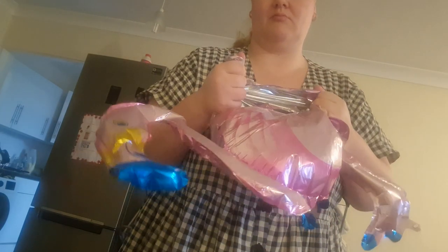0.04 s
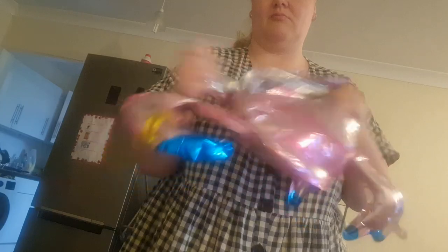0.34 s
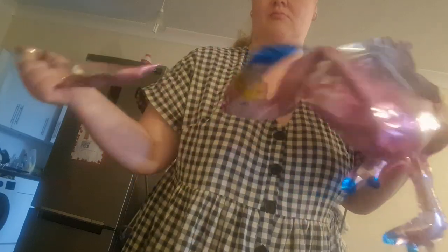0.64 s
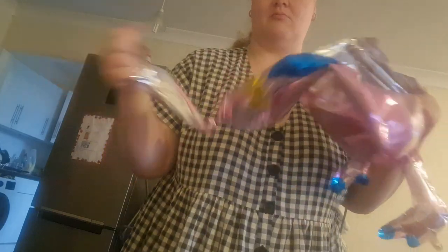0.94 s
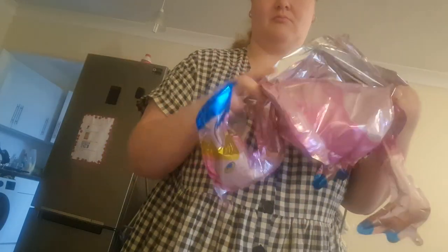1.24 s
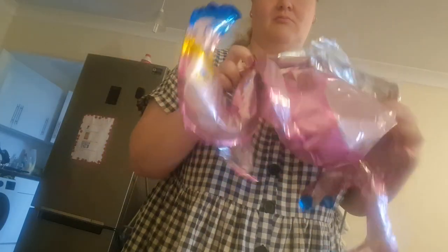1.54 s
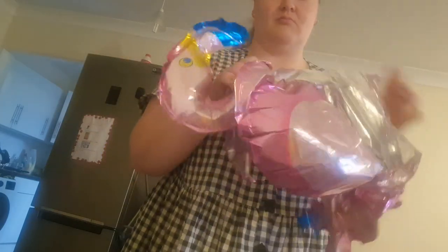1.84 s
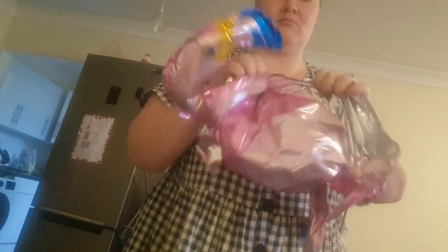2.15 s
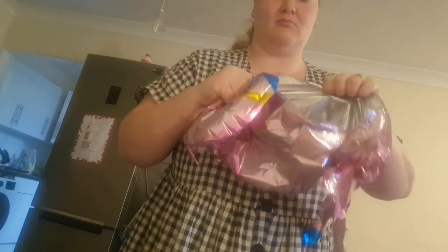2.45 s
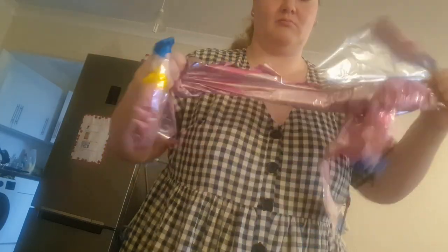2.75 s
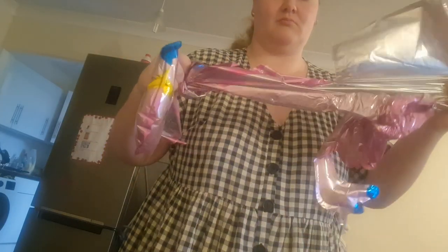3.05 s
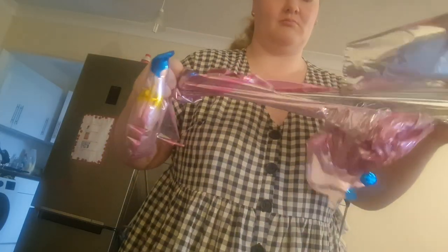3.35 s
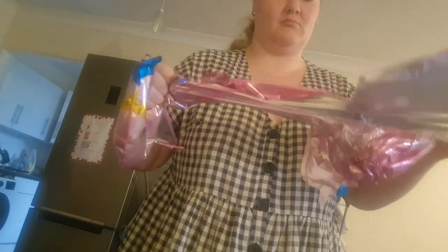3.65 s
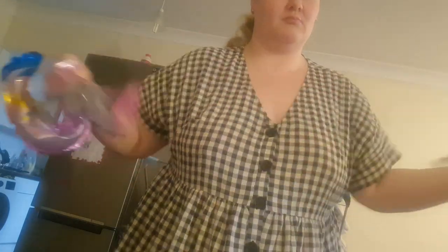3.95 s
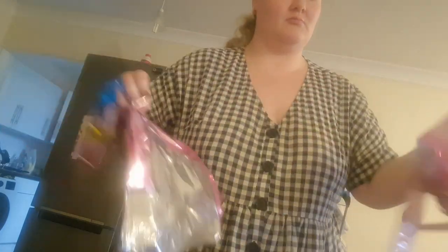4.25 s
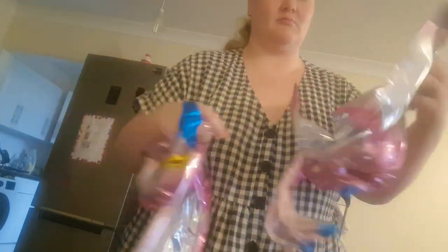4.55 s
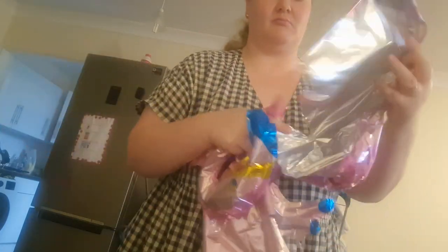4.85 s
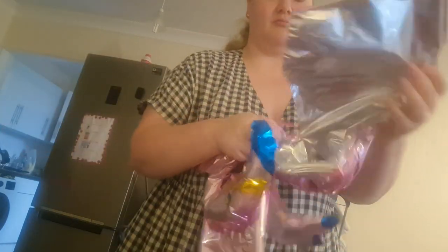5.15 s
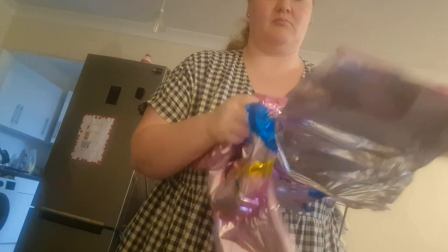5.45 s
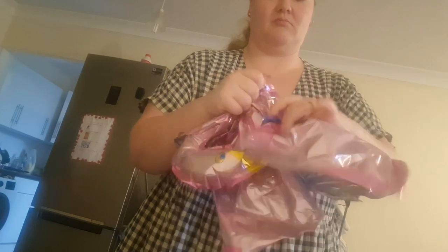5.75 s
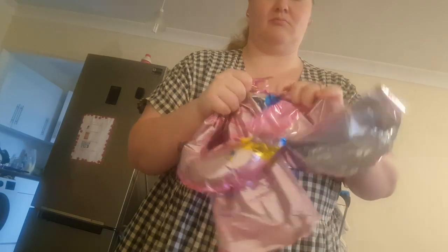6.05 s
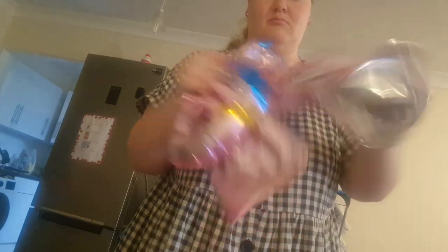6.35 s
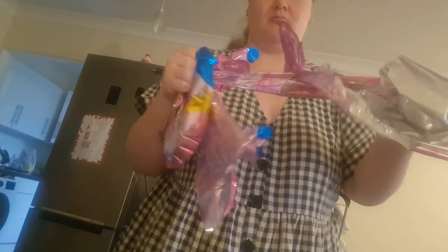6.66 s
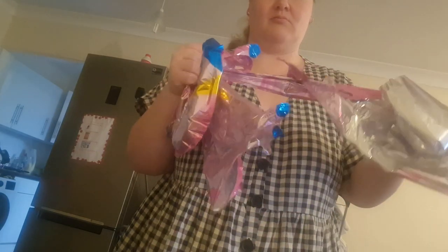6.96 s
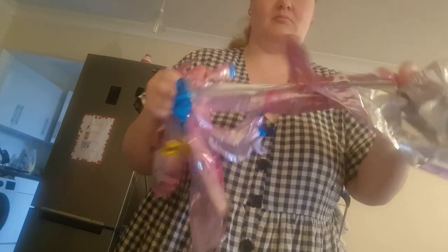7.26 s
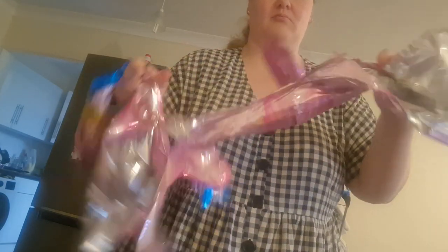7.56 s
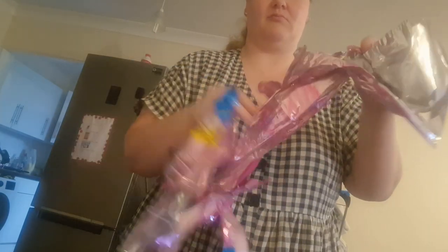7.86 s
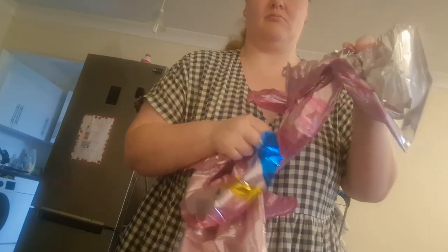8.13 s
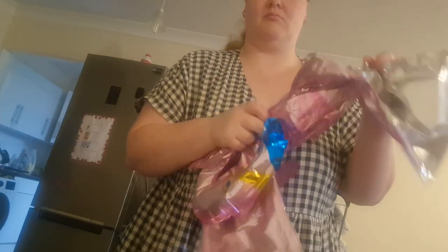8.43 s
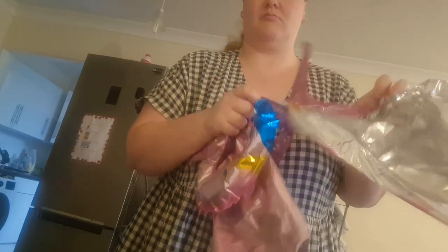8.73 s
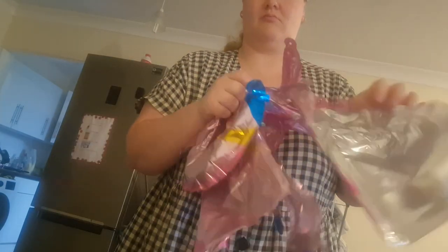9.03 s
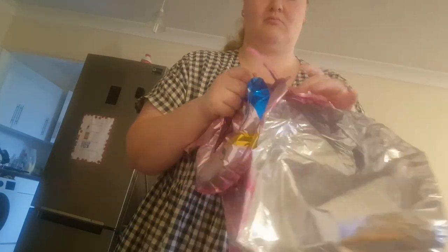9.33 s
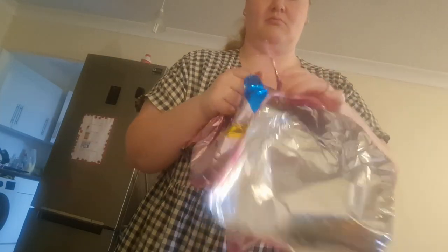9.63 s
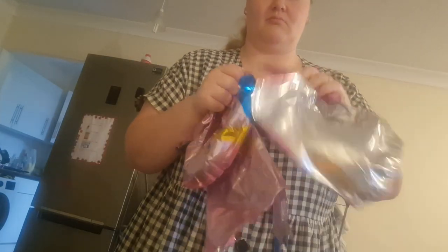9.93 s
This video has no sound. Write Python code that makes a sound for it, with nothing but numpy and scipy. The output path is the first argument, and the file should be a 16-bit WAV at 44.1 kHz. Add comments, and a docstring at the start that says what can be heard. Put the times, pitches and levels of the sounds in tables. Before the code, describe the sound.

A deflated foil balloon is crumpled and pulled by hand, giving a dense, uneven crackle with small pops. About three seconds in, the taut film snaps loudly and rips, then tears again a second later with a brief flap. Quieter crinkling follows, then one more loud rip and further rustling. It is heard from about a metre away in a small kitchen with a faint appliance hum.

```python
"""Tearing a foil balloon

A limp foil balloon is crumpled, stretched and torn by hand in a kitchen, about a metre from a phone.
Creases buckle in a dense crackle; taut film snaps, rips in fast runs and flaps the air as it slackens.
Near surfaces and the small room answer each crack, over a faint appliance hum."""
import sys
import numpy as np
from scipy import signal
from scipy.fft import rfft, irfft, next_fast_len
from scipy.io import wavfile
from scipy.ndimage import uniform_filter1d

SR = 44100
rng = np.random.default_rng(int(sys.argv[2]) if len(sys.argv) > 2 else 0)


def output_pcm(signal):
    """Save a mono or channel-first signal as 16-bit PCM at the path in sys.argv[1].

    Samples are clipped to [-1, 1] before scaling.
    """
    pcm = np.clip(np.atleast_2d(signal).T, -1, 1) * 32767
    wavfile.write(sys.argv[1], SR, np.round(pcm).astype(np.int16))


N = 440559
TIME_S = np.arange(N) / SR

# House rumble and hiss. Each row: frequency in Hz, relative density in dB.
RUMBLE_SPECTRUM = [(20, -15), (36, 10), (50, -2.5), (72, 6), (110, 0), (150, -2), (200, -10.5), (300, -14),
                   (550, -40.5), (2000, -51), (16000, -57)]
# Appliance hum. Each row: frequency in Hz, rms level before drift and swell in dB.
HUM_TONES = [(37, -68.5), (73, -73), (98, -66), (122.5, -67)]
# Swell of the deepest hum tone. Each row: time in seconds, gain in dB.
HUM_SWELL = [(0, 6), (.8, -3), (1.4, 11.5), (3.4, 12.5), (4.0, -4), (6.5, -5.5), (8.6, 2.5), (9.99, -11.5)]
# Squeezes and pulls. Each row: start and end of the hold in seconds, build-up in seconds,
# relative crackle level in dB, brightness in dB.
GRIPS = [(0, 0.323, .02, -51.5, -1), (0.457, 0.481, 0.057, -28.5, -2), (0.532, .55, .015, -29, 1),
         (0.634, 0.674, 0.043, -36.5, -2.5), (0.805, 1.11, 0.055, -51.5, 1.5),
         (1.145, 1.154, 0.015, -42, 2.5), (1.363, 1.466, 0.036, -44, -0.5), (1.516, 1.897, 0.04, -43, -1),
         (2.275, 2.434, 0.2, -37.5, -1), (2.552, 2.662, 0.11, -41, -3), (2.89, 3.07, 0.029, -45, 1),
         (3.176, 3.333, 0.06, -48.5, 5.5), (3.45, 3.526, 0.016, -46.5, 7), (3.65, 3.82, 0.033, -53.5, 6),
         (4.208, 4.47, 0.07, -49, 3), (4.559, 5.062, 0.18, -46.5, 0.5), (5.196, 5.247, 0.08, -44.5, 0.5),
         (5.364, 5.597, 0.15, -45, -1.5), (5.683, 5.71, 0.059, -49, -3), (5.831, 5.9, 0.053, -41.5, -1),
         (6.01, 6.413, 0.12, -44.5, 1), (6.453, 6.531, 0.011, -34.5, 6), (6.804, 6.97, 0.082, -51.5, 3),
         (7.065, 7.08, 0.022, -54, -0.5), (7.276, 7.421, 0.045, -44, 0.5), (7.55, 7.724, .12, -49, 2),
         (7.864, 8.227, 0.13, -47.5, 0.5), (8.306, 8.533, 0.025, -48, 1), (8.583, 8.64, .03, -45, -1.5),
         (8.794, 9.072, 0.26, -48, 0.5), (9.122, 9.27, 0.15, -54.5, -2), (9.401, 9.46, 0.011, -62, 1),
         (9.595, 9.665, 0.03, -51.5, -1.5), (9.826, 9.952, 0.054, -42.5, 1.5)]
# Buckling panels. Each row: time in seconds, typical pitch in Hz, offset from the grip level in dB.
PANELS = [(0, 1190, -2), (.6, 1200, -7.5), (1.2, 1300, -8.5), (2.3, 1400, -5.5), (3.6, 1400, -14),
          (4.7, 1700, -5), (5.5, 1420, -10), (6.2, 1420, -4.5), (7.0, 1114, -9.5), (7.7, 1260, -13.5),
          (8.3, 1565, -3.5), (9.1, 1400, -5), (9.7, 1200, -14), (9.99, 1330, 1)]
# Folds snapping through. Each row: time in seconds, relative level in dB, panel pitch in Hz,
# brightness in dB.
SNAPS = [(0.0253, -36.5, 1170, -24), (0.096, -42.5, 990, 14), (0.1738, -21.5, 1370, 6),
         (0.2617, -21.5, 1285, 8.5), (0.3373, -21.5, 1360, -2), (0.3553, -28.5, 1380, 1),
         (0.3813, -22.5, 2080, -4), (0.4044, -27, 1400, 1), (0.4213, -26, 1380, -25),
         (0.4414, -21.5, 1410, -21), (0.821, -33.5, 1350, -1), (1.128, -34, 2400, 14),
         (1.1524, -33.5, 1370, 5), (1.3514, -35, 1340, 6), (1.5089, -35.5, 1530, 3),
         (2.6453, -21.5, 1460, -9), (2.76, -12, 1560, 5), (2.7801, -11.5, 1530, 3), (2.913, -22, 2440, -2),
         (3.1876, -16, 1990, 1.5), (3.2395, -21.5, 1200, 4), (3.2916, -15.5, 1250, 7.5),
         (3.4665, -15.5, 2040, 5), (3.4866, -25.5, 2090, 12), (3.5115, -30, 1070, -4),
         (3.589, -26, 1500, 4), (3.669, -13, 1380, 21), (3.8156, -25, 1400, 7), (3.843, -5.5, 1244, 7),
         (3.864, -7, 1620, 7.5), (3.8697, -6, 1590, 19), (4.2003, -41.5, 1450, -14), (4.767, -43, 960, 10),
         (4.8267, -40, 1740, -11), (4.8631, -37, 1860, -5), (4.9376, -39.5, 1420, 2),
         (5.1043, -40, 1700, -29), (5.1446, -35.5, 1880, 8), (5.2154, -34, 960, 4), (5.392, -32, 2440, 17),
         (5.817, -36, 1500, 3), (6.0335, -35.5, 1410, -10), (6.4677, -7.5, 1080, 9.5),
         (6.5307, -9.5, 1100, -5), (6.5394, -11.5, 1900, -2.5), (6.7525, -42.5, 1010, -19),
         (6.7995, -40, 1253, 0), (7.2175, -33, 2350, 9), (7.245, -36, 1040, -8), (7.3817, -34.5, 1300, 10),
         (7.278, -29, 2260, 18), (7.4347, -34, 1570, -8), (7.7155, -36.5, 1460, 20),
         (7.871, -35.5, 2600, 7), (7.946, -40, 1250, 5), (8.1447, -36, 2240, 2), (8.177, -34, 1350, 11),
         (8.3628, -39, 1970, 10), (8.5044, -34, 2040, 3), (8.8972, -34, 1310, 18), (9.0286, -35, 1460, -9),
         (9.5476, -47.5, 2480, 3), (9.591, -46, 1420, -13), (9.6916, -45.5, 1010, -15),
         (9.7818, -40.5, 1640, -15)]
# Slack film swinging. Each row: centre in seconds, pitch in Hz, envelope peak in dB,
# half length in seconds.
FLAPS = [(0.543, 94, -39, .012), (2.646, 130, -33.5, 0.0035), (2.647, 297, -36, 0.0035),
         (2.773, 118, -29.5, 0.008), (3.669, 100, -31, 0.0038), (3.846, 108, -33, 0.0074),
         (3.864, 240, -32, .004), (6.538, 326, -25, 0.0023), (6.539, 65, -28, 0.008),
         (6.550, 316, -24.5, 0.0064), (6.552, 129, -21, 0.0075), (6.590, 141, -49, 0.0066),
         (6.637, 126.6, -43, 0.019)]
# Runs of a tear. Each row: start and end in seconds, relative level at start and end in dB,
# brightness in dB, bass gain in dB.
RIPS = [(2.643, 2.756, -27, -37.5, -3, -6.5), (2.725, 2.756, -30, -17.5, -4, -12),
        (2.761, 2.772, -5, -22, -0.5, -10.5), (2.775, 2.831, -16.5, -37.5, 3, -10),
        (3.282, 3.33, -37, -47, 4, 0), (3.471, 3.505, -39, -41.5, -9, -3),
        (3.669, 3.681, -18, -38.5, -9.5, -2.5), (3.825, 3.855, -31.5, -25.5, 1, -3),
        (3.873, 3.925, -30, -32, -2.5, -1.5), (6.473, 6.52, -29, -27, -1.5, -11),
        (6.521, 6.555, -25, -22.5, -1.5, 0.5)]
# What every crack sounds like: the film's radiation together with the low resonances of the room # between 200
# and 400 Hz. Each row: frequency in Hz, relative density in dB.
CRACK_SPECTRUM = [(20, -21), (50, -4.5), (150, -0.5), (215, 1.5), (300, -0.5), (400, 0.5), (580, -6),
                  (800, -6), (1100, -1.5), (1500, 0), (1800, -5), (2150, 1), (2800, -3.5), (4000, 1.5),
                  (5600, 0), (7700, -3.5), (10000, -10), (13500, -11), (16000, -15)]
# Spots on the balloon. Each row: lead of the left microphone in seconds, left minus right in dB.
SPOTS = [(0.000098, 3.5), (0.00015, 7.5), (0.000024, 1)]

OCTAVES_HZ = 110 * 2. ** np.arange(8)
EASE_DB_PER_S, RELEASE_S, REST_DB = 14, 0.029, -67
SETTLE_DB, SETTLE_S, SETTLE_BRIGHT_DB = -30.5, 0.068, 9
LEAD_IN_SAMPLES = 256
LEFT_RIGHT = np.array([[1], [-1]])


def undb(db):
    """Decibels to gain."""
    return 10 ** (np.asarray(db) / 20)


def unit(x):
    """Scale to rms 1."""
    return x / np.sqrt(np.mean(x ** 2))


def bin_gains(points, size):
    """Gain of a (Hz, dB) spectrum on FFT bins."""
    hz, db = np.transpose(points)
    return undb(np.interp(np.log(np.fft.rfftfreq(size, 1 / SR) + 1), np.log(hz), db))


def response(points, size=1024):
    """Minimum-phase impulse response of a (Hz, dB) spectrum; energy 1."""
    cepstrum = irfft(np.log(bin_gains(points, size)))
    cepstrum[1:size // 2] *= 2
    cepstrum[size // 2 + 1:] = 0
    return unit(irfft(np.exp(rfft(cepstrum)))) / np.sqrt(size)


def add(track, at_s, sound):
    """Mix a sound into a track."""
    start = max(int(at_s * SR), 0)
    part = sound[:max(N - start, 0)]
    track[start:start + len(part)] += part


def drift(rate_hz):
    """Smooth random drift, spread near 1."""
    hold = int(SR / rate_hz)
    steps = np.repeat(rng.standard_normal(N // hold + 1), hold)
    return 1.275 * uniform_filter1d(uniform_filter1d(steps, hold), hold)[:N]


def tilt(hz):
    """Gain in dB per dB of brightness: lows and mids down, treble up."""
    return np.interp(np.log(hz), np.log([1800, 6000, 13000]), [-.5, .45, .7])


def hum_and_rumble():
    """An appliance hums unsteadily over the low rumble of the house."""
    colour = bin_gains(RUMBLE_SPECTRUM, N)
    mid, side = (unit(irfft(rfft(rng.standard_normal(N)) * colour, N)) for _ in range(2))
    out = undb(-59 + drift(2.6)) * (mid + undb(-16.5) * side * LEFT_RIGHT)
    swell_db = np.interp(TIME_S, *np.transpose(HUM_SWELL))
    for k, (hz, db) in enumerate(HUM_TONES):
        phase = 2 * np.pi * np.cumsum(hz + 1.42 * drift(4)) / SR
        out += np.sqrt(2) * undb(db + 1.6 * drift(3.9) + swell_db * (k == 0)) * np.sin(phase)
    return out


def handling():
    """Crackle level and brightness in dB: grips build, ease and let go; film settles after snaps."""
    power, weighted_bright = np.full(N, undb(REST_DB) ** 2), np.zeros(N)
    for start_s, end_s, build_s, db, bright_db in GRIPS:
        t = np.arange(max(start_s - 1, 0), end_s + .5, 1 / SR)
        force = np.exp(np.minimum(t - start_s, 0) / build_s - np.maximum(t - end_s, 0) / RELEASE_S)
        grip = (force * undb(db - EASE_DB_PER_S * np.maximum(t - start_s, 0))) ** 2
        add(power, t[0], grip)
        add(weighted_bright, t[0], grip * bright_db)
    fade = np.exp(-np.arange(SR // 2) / SR / SETTLE_S)
    for at_s, db, _, _ in SNAPS:
        settle = (undb(db + SETTLE_DB) * fade) ** 2
        add(power, at_s, settle)
        add(weighted_bright, at_s, settle * SETTLE_BRIGHT_DB)
    return 10 * np.log10(power), weighted_bright / power


def crackle(level, bright_db, low_db, top_db, rate_hz, spread_db, colour_db, ring_s, even_s):
    """Creases pop at random and shiver, each with its own size and colour; one track a spot."""
    count = int(rate_hz * N / SR)
    onset, spot = rng.integers(0, N, count), rng.integers(0, len(SPOTS), count)
    strength = undb(spread_db * rng.standard_normal(count))
    # The hands feed energy steadily: a big pop leaves less for its neighbours.
    local_power = uniform_filter1d(np.bincount(onset, strength ** 2, N), int(even_s * SR))
    strength *= level[onset] / np.sqrt(local_power[onset] + 1e-9)
    pole = np.exp(-2 / (ring_s * SR))
    size = next_fast_len(N)
    octave = np.log2(np.clip(np.fft.rfftfreq(size, 1 / SR), OCTAVES_HZ[0], OCTAVES_HZ[-1]))
    spectra = np.zeros((len(SPOTS), len(octave)), complex)
    for hz in OCTAVES_HZ:
        edge_db = low_db[onset] * (hz < OCTAVES_HZ[3]) + top_db[onset] * (hz == OCTAVES_HZ[-1])
        colour = unit(undb(colour_db * rng.standard_normal(count)))
        colour *= undb(bright_db[onset] * tilt(hz) + edge_db)
        band = np.sqrt(np.clip(1 - abs(octave - np.log2(hz)), 0, 1))
        for k in range(len(SPOTS)):
            energy = np.bincount(onset, (strength * colour) ** 2 * (spot == k), N)
            envelope = np.sqrt(signal.lfilter([1 - pole], [1, -pole], energy + 1e-18))
            spectra[k] += band * rfft(envelope * rng.standard_normal(N), size)
    return irfft(spectra, size)[:, :N]


def panel_pop(hz, ring_s, size=1024):
    """A panel flips and rings for a few cycles; energy 1."""
    t = np.arange(size) / SR
    return unit(np.sin(2 * np.pi * hz * t) * t * np.exp(-t / ring_s)) / np.sqrt(size)


def buckling(work_db, rate_hz, gain_db, spread_db, pitch_scatter, ring_s):
    """Wider panels between the creases flip with hollow pops, each at its own pitch."""
    tracks = np.zeros((len(SPOTS), N))
    panel_s, panel_hz, panel_db = np.transpose(PANELS)
    count = int(rate_hz * N / SR)
    times_s = rng.uniform(0, TIME_S[-1], count)
    for k, at_s in enumerate(times_s):
        force, detune = rng.standard_normal(2)
        typical_db = work_db[int(at_s * SR)] + np.interp(at_s, panel_s, panel_db) + gain_db
        gain = undb(typical_db + spread_db * np.tanh(force)) * np.sqrt(SR / 1000)
        hz = np.interp(at_s, panel_s, panel_hz) * np.exp(pitch_scatter * detune)
        add(tracks[k % len(SPOTS)], at_s, gain * panel_pop(hz, ring_s))
    return tracks


def crumpling():
    """Squeezing buckles many small creases; harder work moves larger panels, which add body."""
    work_db, bright_db = handling()
    work_db += 0.61 * drift(16)  # the film gives way unevenly
    low_db = np.minimum(-5.0 + 0.092 * (work_db + 45.5), -1.2) - 0.38 * bright_db
    top_db = 0.16 * np.maximum(work_db + 49.5, 0)  # hard creases are sharper
    creases = crackle(undb(work_db + 1.0), bright_db, low_db, top_db,
                      rate_hz=480, spread_db=3.0, colour_db=5.0, ring_s=0.0018, even_s=0.05)
    panels = buckling(work_db - .5 * bright_db,
                      rate_hz=130, gain_db=2, spread_db=6.5, pitch_scatter=0.17, ring_s=0.00089)
    return creases + panels


def snapping(length_s, rise_s, gain_db, low_db, sparkle_db, panel_db, panel_ring_s, size=1024):
    """A taut fold cracks and its panel pops; in dull snaps the pop leads."""
    tracks, t = np.zeros((len(SPOTS), N)), np.arange(size) / SR
    hz = np.fft.rfftfreq(size, 1 / SR) + 1
    film = response(CRACK_SPECTRUM)
    envelope = np.exp(-(t / length_s) ** 4) * (1 - np.exp(-t / rise_s)) ** 2
    for k, (at_s, db, pitch_hz, bright_db) in enumerate(SNAPS):
        burst = rng.standard_normal(size) * envelope
        bass_db = (low_db + 0.13 * bright_db) / (1 + (hz / 700) ** 4)
        loss_db = 0.24 * max(db + 13.5, 0)  # big folds are duller
        top_db = (sparkle_db - loss_db) / (1 + (9000 / hz) ** 8)
        colour = response(np.c_[hz, 0.97 * bright_db * tilt(hz) + bass_db + top_db])
        crack = unit(np.convolve(burst, colour)[:size]) / np.sqrt(size)
        snap = crack + undb(panel_db - bright_db) * panel_pop(pitch_hz, panel_ring_s)
        rms_3ms = np.sqrt(np.sum(np.convolve(snap, film) ** 2) / (.003 * SR))
        add(tracks[k % len(SPOTS)], at_s - rise_s, snap * undb(db + gain_db) / rms_3ms)
    return tracks


def flapping():
    """The freed sheet swings briefly, slowing as it slackens."""
    track = np.zeros(N)
    for centre_s, hz, db, half_s in FLAPS:
        t = np.arange(-3 * half_s, 3 * half_s, 1 / SR)
        swing = np.sin(2 * np.pi * hz * t * np.exp(-.06 * t / half_s))
        add(track, centre_s + t[0], undb(db) * swing * np.exp(-(t / half_s) ** 2))
    return track


def tearing():
    """A running tear breaks the film in tiny steps, too fast to hear apart."""
    level, bright_db, low_db = np.zeros((3, N))
    for start_s, end_s, first_db, last_db, run_bright_db, run_low_db in RIPS:
        run = (TIME_S >= start_s) & (TIME_S < end_s)
        level[run] = undb(np.linspace(first_db, last_db, run.sum()))
        bright_db[run], low_db[run] = run_bright_db, run_low_db
    return crackle(level, bright_db, low_db, top_db=np.full(N, -1.5),
                   rate_hz=4000, spread_db=5, colour_db=2.0, ring_s=0.00092, even_s=0.01)


def kitchen(lead_s, pan_db, sheet_db, sheet_s, near_db, near_s, tail_db, t60_s, treble_t60_s):
    """Stereo direct and echo responses: the foil shivers, body and cupboards reflect, the room rings."""
    size = SR // 2
    t, hz = np.arange(size) / SR, np.fft.rfftfreq(size, 1 / SR)
    noise = rng.standard_normal((2, size))
    dull = signal.sosfilt(signal.butter(2, 6000, fs=SR, output="sos"), noise)
    bright = signal.sosfilt(signal.butter(2, 6000, "high", fs=SR, output="sos"), noise)
    tail = (dull * 1000 ** (-t / t60_s) + bright * 1000 ** (-t / treble_t60_s)) * (t > .01)
    near = rng.standard_normal((2, size)) * np.exp(-t / near_s) * (t > .0025)
    sheet = rng.standard_normal((2, size)) * np.exp(-t / sheet_s)
    decay = undb(sheet_db) * unit(sheet) + undb(near_db) * unit(near) + undb(tail_db) * unit(tail)
    mid, side = rfft(decay) / np.sqrt(2 * size)
    coherence = np.sinc(hz / 1300)  # long waves reach both microphones alike
    echoes = mid * np.sqrt(1 + coherence) + LEFT_RIGHT * side * np.sqrt(1 - coherence)
    direct = undb(LEFT_RIGHT * pan_db / 2) * np.exp(2j * np.pi * hz * LEFT_RIGHT * lead_s / 2)
    # Echoes ripple the spectrum finely but leave its broad colour alone.
    colour = np.sqrt(uniform_filter1d(np.mean(abs(direct + echoes) ** 2, axis=0), size=80))
    return [np.roll(irfft(part / colour), LEAD_IN_SAMPLES, axis=1) for part in (direct, echoes)]


def scene():
    """Cracks take a common colour, the film's and the room's low resonances, and reach two microphones from
    three spots on the balloon."""
    snaps = snapping(length_s=0.0027, rise_s=.0006, gain_db=-1.0, low_db=-3, sparkle_db=1.5,
                     panel_db=-10.0, panel_ring_s=0.00093)
    rustle = crumpling() + tearing()
    film = response(CRACK_SPECTRUM)[None]
    rustle, snaps = (signal.oaconvolve(x, film, axes=1)[:, :N] for x in (rustle, snaps))
    flaps = flapping()
    out = hum_and_rumble() + flaps
    for k, (lead_s, pan_db) in enumerate(SPOTS):
        direct, echoes = kitchen(lead_s, pan_db, sheet_db=-7.5, sheet_s=.0008, near_db=3, near_s=0.016,
                                 tail_db=-10.5, t60_s=0.44, treble_t60_s=0.28)
        straight = rustle[k] + undb(2.1) * snaps[k]  # taut film beams its snaps at the phone
        scattered = rustle[k] + undb(-1.6) * snaps[k] + undb(-10) * flaps
        heard = signal.oaconvolve(straight[None], direct, axes=1)
        heard += signal.oaconvolve(scattered[None], echoes, axes=1)
        out += heard[:, LEAD_IN_SAMPLES:LEAD_IN_SAMPLES + N]
    return out


def record(dry):
    """The phone cuts the deepest bass, clips the highest peaks and cuts the top."""
    low_cut = signal.butter(2, 25, "high", fs=SR, output="sos")
    top_cut = signal.ellip(8, .2, 70, 16100, fs=SR, output="sos")
    clipped = np.clip(signal.sosfilt(low_cut, dry), -.85, .85)
    return signal.sosfilt(top_cut, clipped)


dry = scene()
out = record(dry)
output_pcm(out)
```